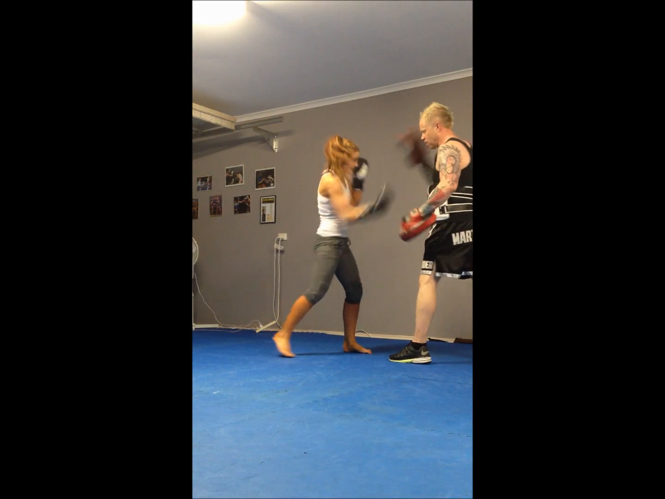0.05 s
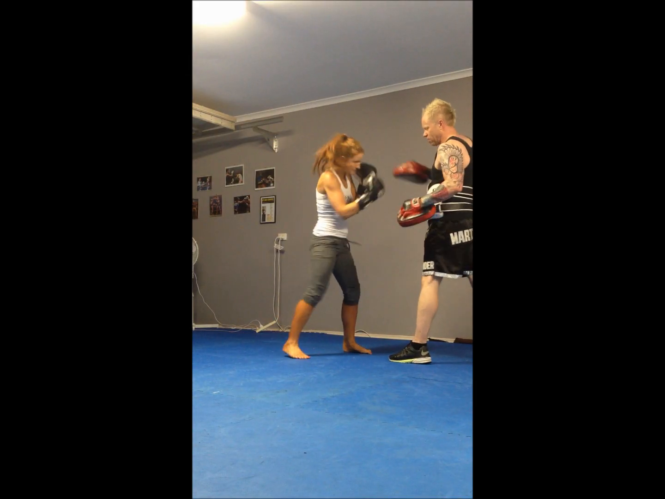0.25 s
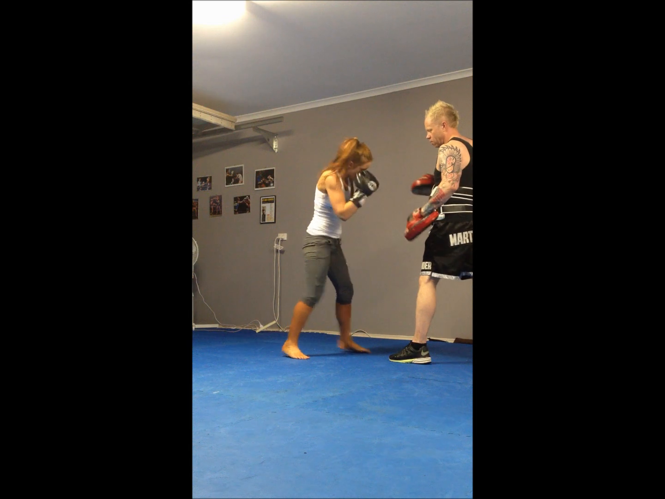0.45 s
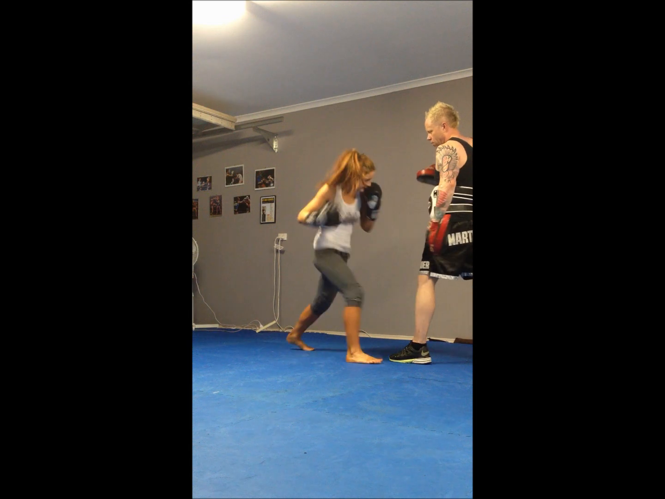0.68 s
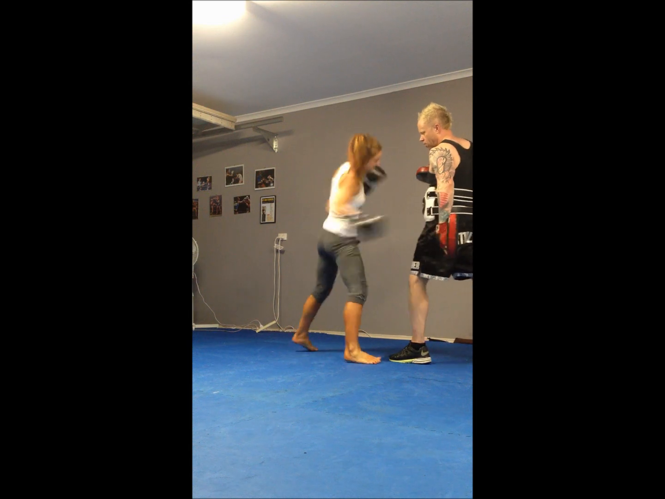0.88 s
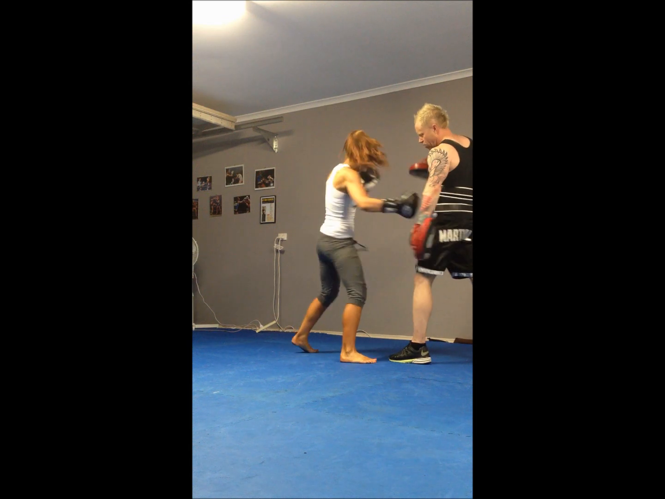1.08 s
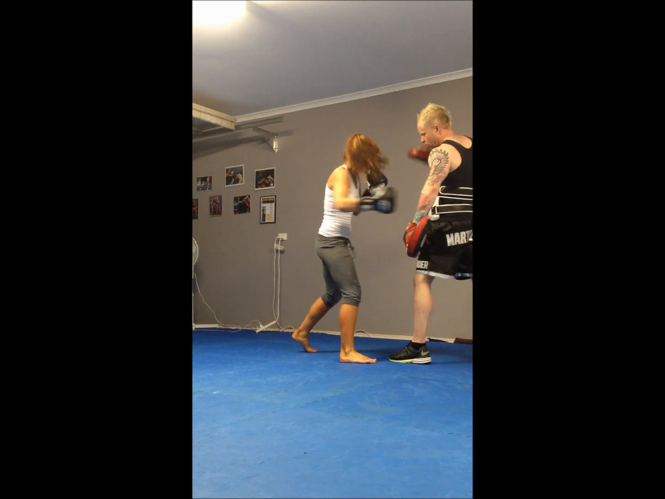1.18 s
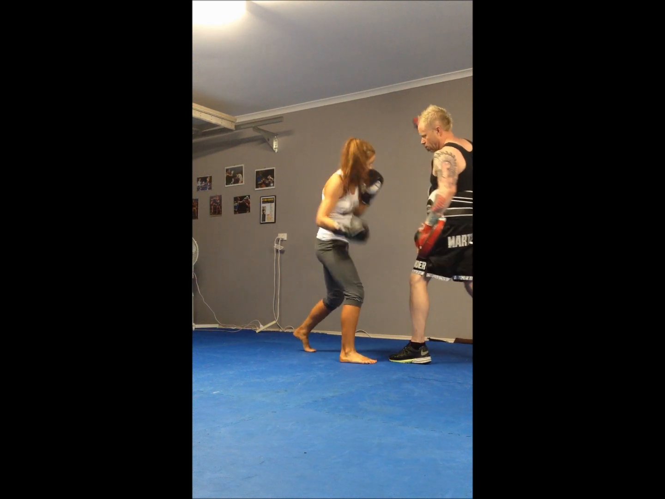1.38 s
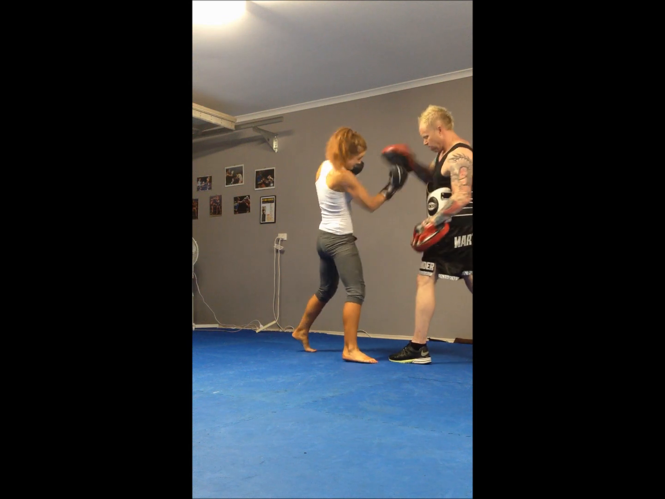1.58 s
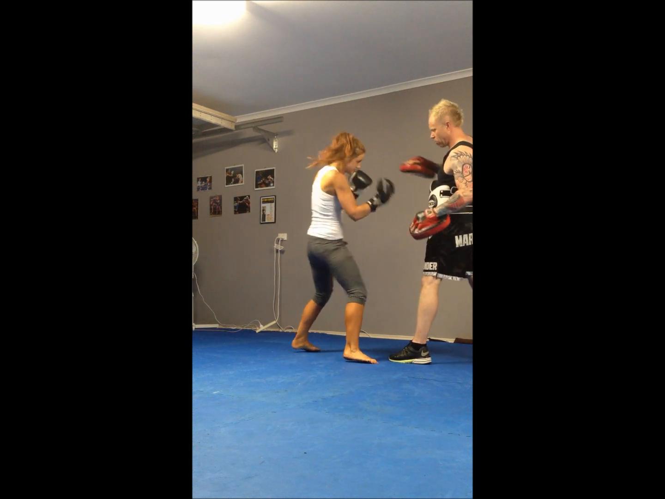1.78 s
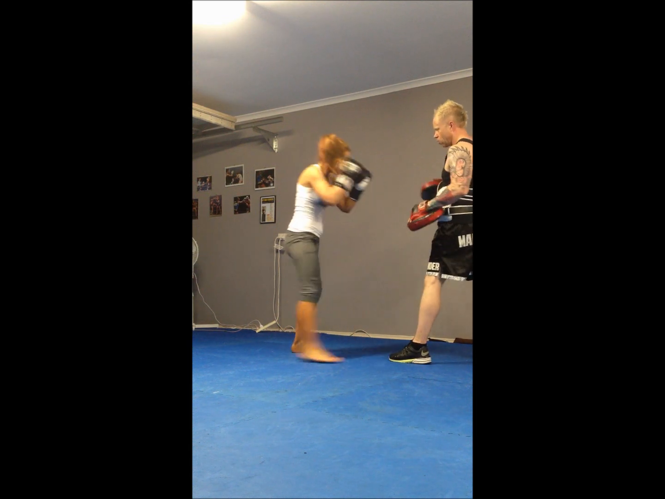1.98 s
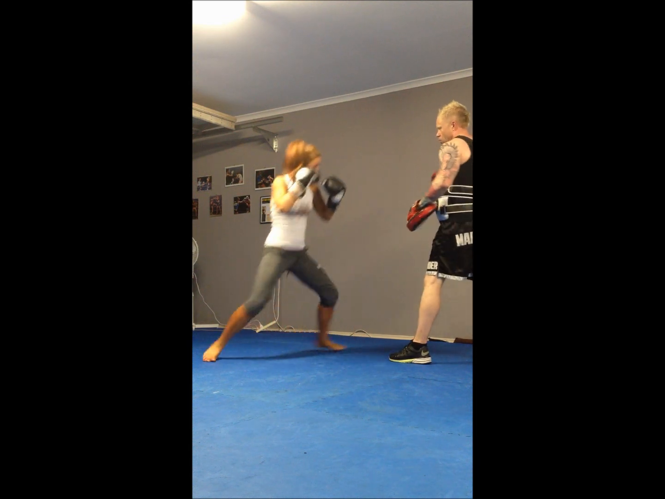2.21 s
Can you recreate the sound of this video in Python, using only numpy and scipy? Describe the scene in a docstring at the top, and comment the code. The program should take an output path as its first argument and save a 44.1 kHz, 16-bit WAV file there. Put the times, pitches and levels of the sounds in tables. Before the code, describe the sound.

Boxing gloves smack focus mitts in a bare, echoing room. A bright leather slap with a padded thump lands at 0.2 s, its boomy tail fading over half a second. A sole pats the mat hollowly at 0.8 s. A duller punch hits at 1.1 s, another crisp one at 1.7 s. Soft scuffs swell between and until 2.2 s, over faint airy room noise and a low hum rising slightly.

```python
"""Three punches land on hand-held focus mitts in a bare, echoing training room.
Each is a leather slap (two short noise bursts) over the thump of the padding (dying sines).
The walls answer with reflections and a fading tail, and a few room tones boom on.
Between them feet and gear scuff (swelling, grainy noise) and one sole pats the mat.
Behind it all lie airy room noise and a faint hum."""
import sys
import numpy as np
from scipy import signal
from scipy.fft import rfft, irfft
from scipy.io import wavfile
from scipy.ndimage import uniform_filter1d

SR = 44100
rng = np.random.default_rng(int(sys.argv[2]) if len(sys.argv) > 2 else 0)


def unload_wav(signal):
    """Save mono or channel-first audio to the path in sys.argv[1] as 16-bit WAV at rate SR, clipped to [-1, 1]."""
    wavfile.write(
        sys.argv[1],
        SR,
        np.round(np.clip(np.atleast_2d(signal).T, -1, 1) * 32767).astype(np.int16),
    )


N = 99225  # length in samples: 2.25 s


def amp(db):
    """Turns decibels into a gain."""
    return 10 ** (np.asarray(db) / 20)


def unit(x):
    """Scales a sound to an rms level of 1."""
    return x / np.sqrt(np.mean(x ** 2) + 1e-20)


def read(points, hz):
    """Reads a table at any frequency, in straight lines along a log-frequency axis."""
    table_hz, value = np.transpose(points)
    return np.interp(np.log(hz + 1), np.log(table_hz + 1), value)


def bump(hz, centre_hz, octaves):
    """A bell of height 1 on a log-frequency axis."""
    return np.exp(-.5 * (np.log2((hz + 1) / centre_hz) / octaves) ** 2)


def add(mix, start_s, sound):
    """Mixes a sound in at a start time, cutting off what runs past the end."""
    part = mix[round(start_s * SR):][:len(sound)]
    part += sound[:len(part)]


def colour(x, db_at, size=4096):
    """Filters a sound by a gain in dB for each frequency, without sounding ahead of time."""
    hz = abs(np.fft.fftfreq(size, 1 / SR))
    log_gain = np.log(amp(db_at(hz)))
    # the Hilbert transform finds the phase that puts the energy as early as possible
    spectrum = np.exp(signal.hilbert(log_gain).conj())
    taps = np.fft.ifft(spectrum).real[:size // 2]
    return signal.fftconvolve(x, taps)[:len(x)]


def burst(envelope, count=6):
    """Noise shaped by an envelope, evened out towards a flat spectrum, with energy 1."""
    size = len(envelope)
    x = envelope * rng.standard_normal(size)
    for _ in range(count):
        x = irfft(np.exp(1j * np.angle(rfft(x))), size)  # flatten the spectrum
        local_level = np.sqrt(abs(uniform_filter1d(x ** 2, size=40)) + 1e-12)
        x = x * envelope / local_level  # restore the envelope
    return x / np.linalg.norm(x)


def ring(modes, t):
    """Dying sines, one for each mode, in alternating polarity."""
    total = 0
    for k, (hz, db, t60_s) in enumerate(modes):
        decay = np.exp(-np.log(1000) * t / t60_s)
        total = total + (-1) ** k * amp(db) * decay * np.sin(2 * np.pi * hz * t)
    return total


# Brightness of leather hitting leather: pitch_hz, level_db (relative)
LEATHER_COLOUR = [(150, -7), (400, 2), (800, 4), (1200, 1), (2000, -4.5), (3000, -3.5), (4400, 1),
                  (5300, -7), (6500, -2.5), (8200, 3), (10000, -6), (15000, -7.5)]
# Where each punch adjusts that brightness: pitch_hz
SLAP_TONE_HZ = (500, 950, 1600, 2800, 4300, 9000)
SLAP_DB, SLAP_DECAY_S = 17, 0.00179  # level before colouring; fall to 1/e
CRUSH_DB, CRUSH_DECAY_S = -13, 0.0117  # slower fading part, relative to the first contact


def slap(t, second_s, second_db, tone_db):
    """Leather meets leather twice in quick succession, giving short bursts of coloured noise."""
    first = np.exp(-t / SLAP_DECAY_S)
    second = amp(second_db) * (t > second_s) * np.exp(-abs(t - second_s) / SLAP_DECAY_S)
    crush = amp(CRUSH_DB) * np.exp(-t / CRUSH_DECAY_S)
    contact = np.zeros(SR)
    add(contact, 0, burst((first + second + crush)[:4096]))
    tone = list(zip(SLAP_TONE_HZ, tone_db))
    return amp(SLAP_DB) * colour(contact, lambda f: read(LEATHER_COLOUR, f) + read(tone, f))


# Tones of the padding, before each punch's pitch ratio:
# pitch_hz, level_db (relative), t60_s (time to fall 60 dB)
PADDING_MODES = [(143, -21, .06), (230, 1, 0.064), (287, -2, 0.057), (368.5, -3.5, 0.067),
                 (520.6, -14, 0.0322)]
# Tone shaping of the thump, with its low cut: pitch_hz, gain_db
THUMP_COLOUR = [(30, -16), (90, -13), (130, -2.5), (190, 1.5), (600, 4), (1500, -12)]
THUMP_DB = -14


def thump(t, thump_db, pitch):
    """The padding rings briefly; a lower pitch ratio makes it deeper and slower to die."""
    padding = ring(PADDING_MODES, t * pitch)
    return -amp(THUMP_DB + thump_db) * colour(padding, lambda f: read(THUMP_COLOUR, f))


# Standing waves of the room: pitch_hz, level_db (relative), t60_s (time to fall 60 dB)
STANDING_WAVES = [(175.9, -57.5, 0.95), (215.8, -60.5, 1), (288, -58.5, 0.65), (293.5, -50.5, 0.97),
                  (376.3, -54, 0.88), (478, -49, 0.94), (561, -34, 0.81), (671, -32, 0.56)]
BOOM_DB = -7.5
FAVOUR_DB = 4.5  # most that a standing wave can gain


def boom(padding_thump, t, favoured_hz):
    """The thump sets the standing waves ringing, most strongly boosted near one pitch."""
    waves = []
    for hz, db, t60_s in STANDING_WAVES:
        boost_db = FAVOUR_DB * bump(hz, favoured_hz, 0.067)
        waves.append((hz, db + boost_db, t60_s))
    return amp(BOOM_DB) * signal.fftconvolve(padding_thump, ring(waves, t))[:len(t)]


def punch(thump_db, pitch, second_s, second_db, tail_db, favoured_hz, *tone_db):
    """Slap and thump sound in the room; depending on its place, a punch favours one boom."""
    t = np.arange(SR) / SR
    leather_slap = slap(t, second_s, second_db, tone_db)
    padding_thump = thump(t, thump_db, pitch)
    return room(leather_slap + padding_thump, tail_db) + boom(padding_thump, t, favoured_hz)


# The punches: start_s, thump_db (relative), padding_pitch_ratio, second_contact_s (after the first),
# second_contact_db (relative to the first), room_tail_db (relative), favoured_standing_wave_hz,
# then slap_db (relative) at each pitch of SLAP_TONE_HZ
PUNCHES = [(0.2303, -0.45, 1, .006, -2, 1, 371, 0, -0.5, 2, 1, -1.5, -0.5),
           (1.084, 0.34, 0.96, .0036, 3.5, -0.32, 217, -3, -6, -3.5, -8.5, -13.5, -13),
           (1.6957, -0.15, 0.94, .0098, -5.5, -1.93, 176, -2.5, -0.5, -3.5, -4.5, 0, -2)]


def punches():
    """Each blow starts at its own time, with its own tone and room response."""
    hits = np.zeros(N)
    for start_s, *blow in PUNCHES:
        add(hits, start_s, punch(*blow))
    return hits


# How long the room rings: pitch_hz, t60_s (time to fall 60 dB)
ROOM_T60 = [(100, 0.91), (220, 0.62), (450, 0.57), (900, 0.58), (1700, 0.69), (4200, 0.61), (8000, 0.64),
            (14000, 0.51)]
# Colour of the room's tail: pitch_hz, gain_db
ROOM_COLOUR = [(60, -38), (120, 2), (190, -3.5), (330, 2.5), (600, 10.5), (1000, 1), (1700, 13),
               (4200, 10.5), (8000, 3.5), (14000, -3)]
BUILD_S = 0.0055  # time constant of the tail's rise


def room_tail(tail_db):
    """Many overlapping reflections act like noise that dies at its own rate in each band."""
    t = np.arange(SR) / SR
    hz, frame_s, bands = signal.stft(rng.standard_normal(SR), SR, nperseg=256)
    t60_s = read(ROOM_T60, hz)[:, None]
    even_energy = np.sqrt(2 * np.log(1000) / (t60_s * SR))  # offsets the energy of longer decays
    bands = bands * amp(-60 * frame_s / t60_s) * even_energy
    tail = signal.istft(bands, SR, nperseg=256)[1][:SR]
    tail = tail * (1 - np.exp(-t / BUILD_S))
    return colour(tail, lambda f: read(ROOM_COLOUR, f) + tail_db)


# Nearest reflections: delay_s, level_db (before their low tones are softened)
ECHOES = [(.0022, -1.5), (.0085, -1.5), (.0155, -14), (.022, -27.5), (.029, -7), (.0425, -10.5)]


def room(x, tail_db=0):
    """Direct sound, blurred nearest reflections with softened lows, and the dying tail."""
    response = room_tail(tail_db)
    add(response, 0, np.ones(1))  # direct sound
    blur = np.exp(-np.arange(256) / SR / 0.00062)
    for delay_s, db in ECHOES:
        echo = colour(amp(db) * burst(blur), lambda f: -10 / (1 + (f / 400) ** 2))
        add(response, delay_s, echo)
    return signal.fftconvolve(x, response)[:len(x)]


# Friction noise: pitch_hz, gain_db
SCUFF_COLOUR = [(60, -38), (300, 10.5), (2500, 0.5), (4500, 5.5), (5200, -6), (6500, -3), (8200, 0.5),
                (9900, -7), (15000, -1.5)]
GRAIN_DB = 2.5  # rms swing of the grain level


def scuff(peak_s, rise_s, fall_s, db, centre_hz, octaves):
    """Grainy friction noise, strongest around one pitch, that swells and fades."""
    t = np.arange(N) / SR - peak_s
    flutter = unit(uniform_filter1d(rng.standard_normal(N), size=120))
    grains = rng.standard_normal(N) * amp(GRAIN_DB * flutter)
    hiss = unit(colour(grains, lambda f: read(SCUFF_COLOUR, f) + 18 * (bump(f, centre_hz, octaves) - 1)))
    swell = np.exp(-(t / np.where(t < 0, rise_s, fall_s)) ** 2)
    return amp(db) * hiss * swell


# Scuffs of feet and gear: peak_s, rise_s, fall_s, level_db (relative), centre_hz, width_octaves
SCUFFS = [(.222, 0.027, 0.013, -36.5, 1800, 1.1), (1.04, 0.097, 0.056, -42.5, 5110, 5.4),
          (1.3, 0.21, 0.083, -37.5, 8300, .5), (1.43, 0.21, .1, -42, 1300, 2.4),
          (1.68, .15, 0.023, -37, 3150, 2.1), (1.93, 0.11, 0.065, -41.5, 8000, 0.59),
          (2.114, 0.041, 0.047, -35, 7500, 0.74), (2.2, 0.24, .1, -46, 1830, 1.8)]
SCUFF_DB = -5.5  # shared level change


def scuffs():
    """Feet and gear rub in separate, sometimes overlapping swells."""
    return amp(SCUFF_DB) * sum(scuff(*row) for row in SCUFFS)


# Hollow pat of the sole: pitch_hz, gain_db
SOLE_COLOUR = [(60, -60), (150, -31), (350, -9), (850, -8), (1050, 1), (1200, 2), (1380, -11),
               (2200, -21.5), (4200, -18), (5600, -22), (8200, -19), (10500, -25), (15000, -38)]
STEP_S, STEP_DECAY_S, STEP_DB = .8125, .009, 8.5  # start; fall to 1/e; level before colouring


def step():
    """The hollow pat of a sole on the mat, a coloured noise burst."""
    t = np.arange(4096) / SR
    pat = burst(np.exp(-t / STEP_DECAY_S))
    return amp(STEP_DB) * colour(pat, lambda f: read(SOLE_COLOUR, f))


# Colour of the steady room noise: pitch_hz, level_db (per Hz, relative)
AIR_COLOUR = [(25, -60), (70, -34.5), (115, -14), (170, -15), (215, -5.5), (260, -1), (350, -1.5),
              (440, -7), (660, 0), (750, -7), (830, 4), (950, -14.5), (1150, -9), (1370, -3.5),
              (1480, -5.5), (1600, 1), (1900, -11.5), (2400, -5), (3000, -9.5), (4400, -7), (5300, -19),
              (6500, -15.5), (8000, -10.5), (10000, -23.5), (15000, -24.5)]
AIR_DB = -38.5  # rms


def air():
    """Steady room noise, random and coloured."""
    noise = colour(rng.standard_normal(N + SR), lambda f: read(AIR_COLOUR, f))
    return amp(AIR_DB) * unit(noise[SR:])  # drop the filter's start


# Loudness of the faint hum over time: time_s, level_db (rms)
HUM_LEVEL = [(0, -60), (.75, -59), (1.9, -57), (2.1, -50.5), (2.25, -49)]
HUM_HZ = 209.5


def hum():
    """One steady sine whose level rises towards the end."""
    t = np.arange(N) / SR
    level = amp(np.interp(t, *np.transpose(HUM_LEVEL)))
    return level * unit(np.sin(2 * np.pi * HUM_HZ * t))


def scene():
    """Punches and footwork in the room, over air and hum."""
    hits = punches()
    feet = scuffs()
    add(feet, STEP_S, step())
    return (hits + room(feet) + air() + hum())[None]


LOW_CUT_HZ, CUTOFF_HZ = 60, 15350


def record(dry):
    """The loudest peaks overload softly; then the lowest and highest tones are cut."""
    limited = dry / (1 + (dry / 1.1) ** 4) ** .25
    low_cut = signal.butter(1, LOW_CUT_HZ, "high", fs=SR, output="sos")
    lean = signal.sosfilt(low_cut, limited)
    band_limit = signal.firwin(301, CUTOFF_HZ, window=("kaiser", 8), fs=SR)
    return signal.oaconvolve(lean, band_limit[None], "same")


dry = scene()
out = record(dry)
unload_wav(out)
```